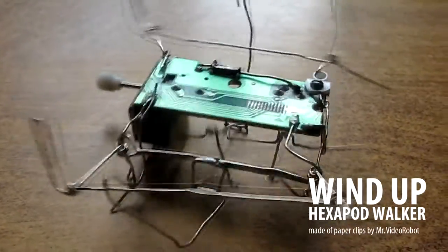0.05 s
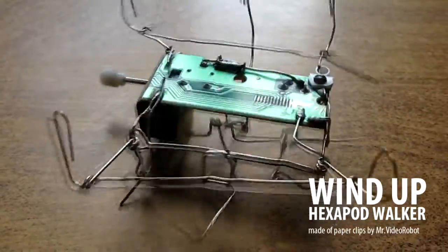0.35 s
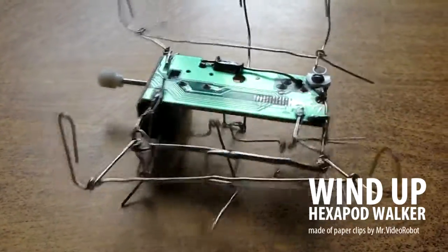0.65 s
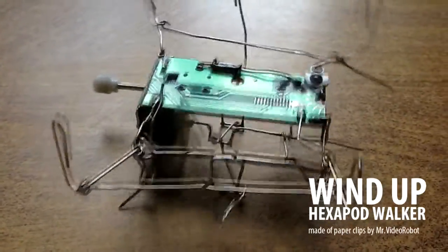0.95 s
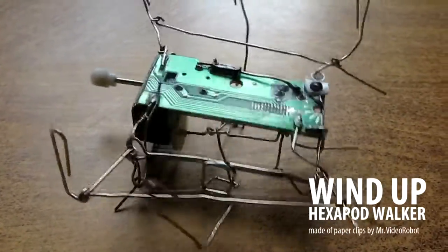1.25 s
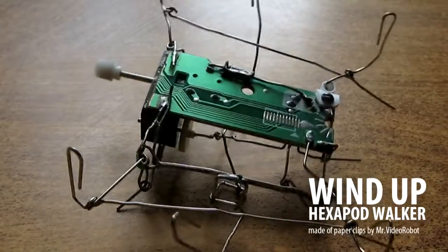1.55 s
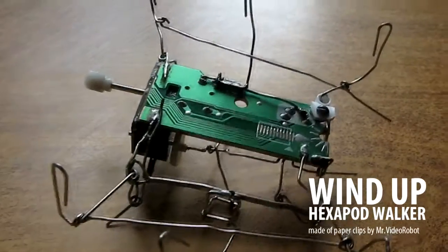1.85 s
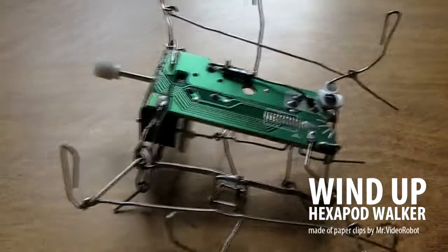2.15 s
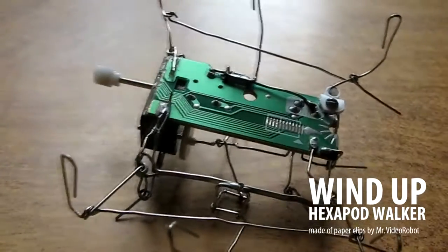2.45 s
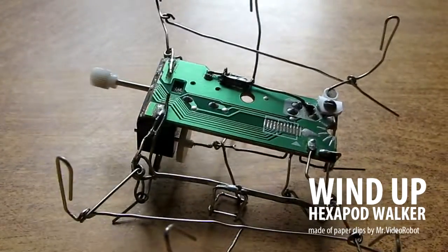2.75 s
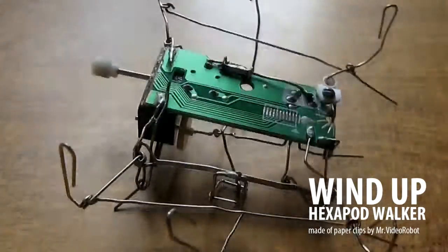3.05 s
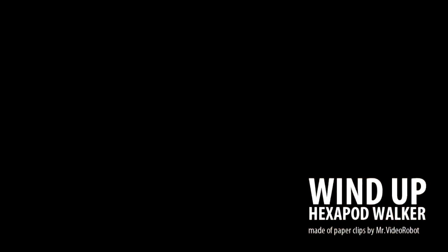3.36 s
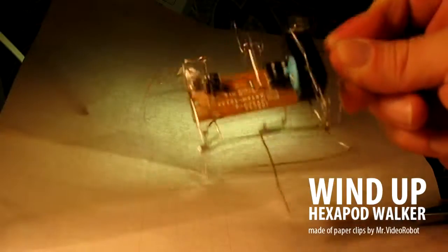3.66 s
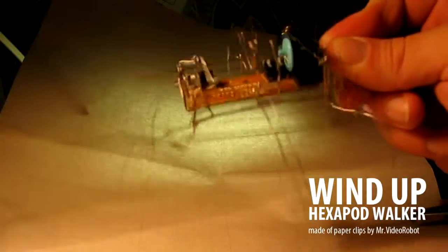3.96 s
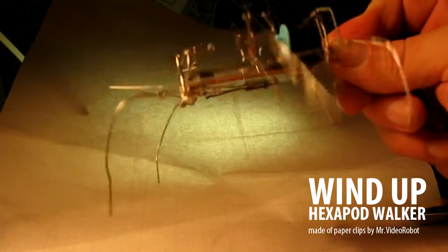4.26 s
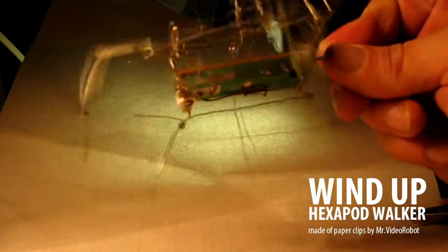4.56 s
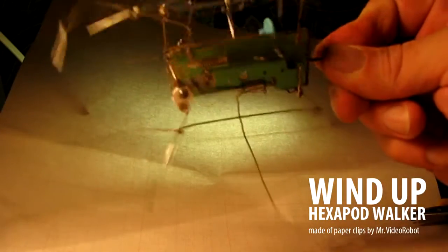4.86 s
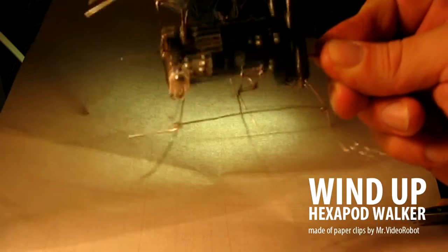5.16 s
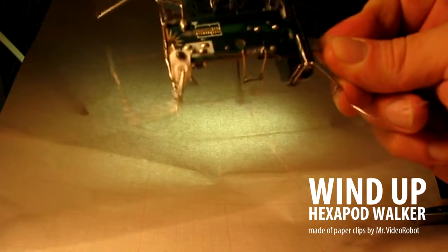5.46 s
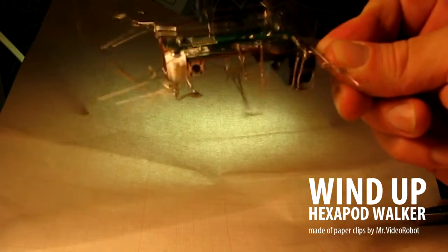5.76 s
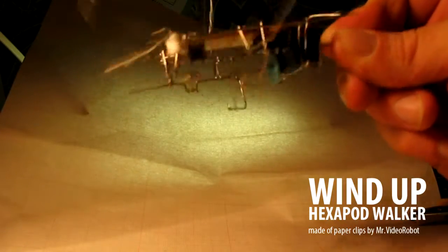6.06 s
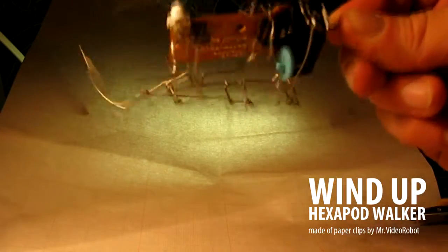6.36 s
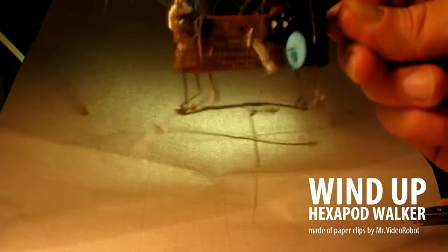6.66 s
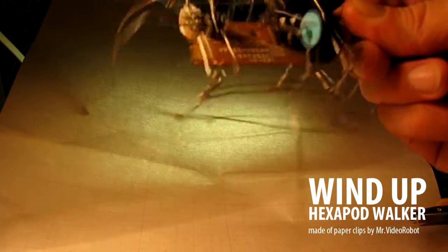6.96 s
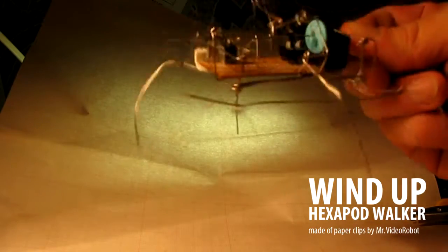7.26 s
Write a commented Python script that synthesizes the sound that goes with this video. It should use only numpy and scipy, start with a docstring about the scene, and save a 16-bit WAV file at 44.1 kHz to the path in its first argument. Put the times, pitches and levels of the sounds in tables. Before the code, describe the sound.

Clockwork toy walking on wood in halting, rattling bursts, stopping with a click; after a pause, a second wind-up mechanism buzzes continuously.

```python
"""Clockwork escapements of two wind-up walkers: an anchor strikes two pallets in turn in a plastic case.
The first toy rattles across a wooden table on wire legs, slows under every step and stops with a click.
Something squeaks faintly while the quiet room fades out.
Then the second toy, held in a hand with its legs in the air, buzzes steadily."""
import sys
import numpy as np
from scipy import signal
from scipy.fft import rfft, irfft, next_fast_len
from scipy.io import wavfile
from scipy.ndimage import map_coordinates

SR = 44100
rng = np.random.default_rng(int(sys.argv[2]) if len(sys.argv) > 2 else 0)


def pcm_store(signal):
    """Save signal as 16-bit PCM."""
    levels = np.round(np.clip(np.atleast_2d(signal), -1, 1) * 32767)
    wavfile.write(sys.argv[1], SR, levels.astype(np.int16).T)


N = 330750
TIME_S = np.arange(N) / SR
TOP_HZ = 15800


def amp(db):
    """Decibels to gain."""
    return 10 ** (np.asarray(db) / 20)


def unit(x):
    """x at rms 1."""
    return x / np.sqrt(np.mean(x ** 2) + 1e-20)


def gain_at(spectrum, hz):
    """Gain from (Hz, dB) rows, interpolated on a log frequency axis."""
    knots_hz, db = np.transpose(spectrum)
    return amp(np.interp(np.log(hz + 1), np.log(knots_hz + 1), db))


def curves(rows):
    """One value per sample for each column after the time."""
    times, *columns = np.transpose(rows)
    return [np.interp(TIME_S, times, column) for column in columns]


def wobble(rate_hz):
    """Smooth random curve with rate_hz knots a second."""
    knots = rng.standard_normal(int(N * rate_hz / SR) + 4)
    return map_coordinates(knots, [TIME_S * rate_hz])


def filtered(x, response):
    """x through a frequency response."""
    size = next_fast_len(N + SR // 4)
    return irfft(rfft(x, size) * response(np.fft.rfftfreq(size, 1 / SR)), size)[:N]


def resonance(x, hz, width_hz):
    """x through one damped mode."""
    return signal.lfilter(*signal.iirpeak(hz, hz / width_hz, fs=SR), x)


def noise(spectrum):
    """Coloured noise of rms 1."""
    return unit(filtered(rng.standard_normal(N), lambda hz: gain_at(spectrum, hz)))


def struck(blows, spectrum, size=2048):
    """Blows ring a body with a minimum-phase response of energy 1."""
    cepstrum = irfft(np.log(gain_at(spectrum, np.fft.rfftfreq(size, 1 / SR))))
    cepstrum[1:size // 2] *= 2
    cepstrum[size // 2 + 1:] = 0
    response = irfft(np.exp(rfft(cepstrum)))
    return signal.fftconvolve(blows, response / np.linalg.norm(response))[:N]


def contacts(times, gains, chatter, decay_s, size=1024):
    """Each contact is a sharp blow followed by decaying random chatter."""
    burst = rng.standard_normal((len(times), size)) * np.exp(-np.arange(size) / (decay_s * SR))
    burst[:, 0] = 0
    burst *= chatter / np.linalg.norm(burst, axis=1, keepdims=True)
    burst[:, 0] = -1
    at = np.round(np.maximum(times, 0) * SR).astype(int)[:, None] + np.arange(size)
    return np.bincount(at.ravel(), (burst * gains[:, None]).ravel(), N)[:N] / np.hypot(1, chatter)


def diffuse_tail(size, t60_s, rise_s):
    """Dense reflections: noise that builds up and decays."""
    t = np.arange(size) / SR
    return rng.standard_normal(size) * amp(-60 * t / t60_s) * (1 - np.exp(-t / rise_s))


def fade_out(power, start_s=1.525, end_s=3.36):
    """The first scene fades to silence; a lower power lingers longer."""
    return np.clip((end_s - TIME_S) / (end_s - start_s), 0, 1) ** power


def fade_in():
    """The second scene opens quickly out of silence."""
    return curves([(3.447, 0), (3.465, .2), (3.53, 1)])[0]


def room_echo(x):
    """Diffuse reflections from the table and walls."""
    tail = diffuse_tail(SR // 2, t60_s=0.22, rise_s=0.002848)
    return signal.fftconvolve(x, tail / np.linalg.norm(tail))[:N]


# Each row: frequency in Hz, level in dB.
DRONE_TONES = [(149, -63.5), (172, -68), (330, -66.5)]


def room_drone():
    """The first room's low drone wavers and fades out."""
    drone = sum(amp(db + 2.5 * wobble(17)) * np.sin(2 * np.pi * hz * TIME_S + .7 * wobble(12))
                for hz, db in DRONE_TONES)
    return fade_out(power=1.4) * drone


# Each row: frequency in Hz, relative level in dB.
HELD_ROOM_SPECTRUM = [(15, -32), (25, 5), (54, 9.5), (91, 4), (420, 0.5), (700, -8), (1500, -30)]


def held_room():
    """Hum and low room noise behind the held toy."""
    hum = amp(-69.5 + 1.1 * wobble(3.3)) * np.sin(2 * np.pi * 46.0 * TIME_S)
    return fade_in() * (hum + amp(-66.0) * noise(HELD_ROOM_SPECTRUM))


# Each row: frequency in Hz, relative level in dB.
RUMBLE_SPECTRUM = [(25, -11), (60, -5), (115, -8.5), (160, 0.5), (200, -3.5), (270, -5), (335, -4.5),
                   (450, -4.5), (600, -7.5), (1000, -10.5), (2000, -13.5), (4000, -52.5)]
HISS_SPECTRUM = [(300, -15), (900, -3), (1600, 1), (3200, -0.5), (5000, -4.5), (9000, -7.5), (12000, -13.5),
                 (15500, -18.5)]
# Each row: time in seconds the rumble change is fully in, time in seconds it starts to fade,
# gear rustle loss in dB, rumble change in dB. Gear rustle changes only where the second time is later.
PAUSES = [(.194, 0.23, -4.5, 11), (.42, 0.38, 3, -9.5), (.528, 0.6, -4, 10.5), (.777, 0.49, -0.5, 1.5),
          (.94, 1.02, 10.5, 11.5), (1.188, 3.4, 2.5, 7)]


def walking_room(rise_s=0.025, fall_s=0.059):
    """Low room noise comes up in most pauses of the ticking, as with automatic gain; fades with hiss."""
    change_db = np.zeros(N)
    for full_s, fade_s, _, db in PAUSES:
        before_s, after_s = np.maximum(full_s - TIME_S, 0), np.maximum(TIME_S - fade_s, 0)
        change_db += db * np.exp(-before_s / rise_s - after_s / fall_s)
    rumble = amp(-58 + change_db) * noise(RUMBLE_SPECTRUM)
    hiss = amp(-52.5) * noise(HISS_SPECTRUM)
    return fade_out(power=1.68) * (rumble + hiss)


# Each row: start in seconds, end in seconds, slip rate in Hz, resonance in Hz, level in dB.
SQUEAKS = [(0.527, 0.656, 1140, 1140, -48), (2.01, 2.114, 3235, 3250, -62.5), (2.2, 2.444, 370, 2480, -59),
           (2.462, 2.74, 323, 2100, -66), (2.488, 2.74, 319, 2870, -69), (2.875, 3.297, 312, 1350, -84),
           (2.9, 3.28, 312, 3300, -83.5)]


def squeaks():
    """Faint stick-slip squeaks: uneven slips through one resonance."""
    out = np.zeros(N)
    for start, end, slip_hz, ring_hz, db in SQUEAKS:
        cycles = np.cumsum(slip_hz * (1 + .005 * wobble(18) + .012 * wobble(250))) / SR
        slips = np.diff(np.floor(cycles), prepend=0)
        swell = np.sin(np.pi * np.clip((TIME_S - start) / (end - start), 0, 1))
        width_hz = 0.24 * ring_hz
        ring = resonance(resonance(slips, ring_hz, width_hz), ring_hz, width_hz)
        out += amp(db + 3.1 * wobble(23)) * swell * unit(ring)
    return out


# Each row: time in seconds, relative level in dB.
LEG_BUMPS = [(.152, -38.5), (.276, -38), (.288, -29.5), (.377, -37), (2.0517, -43), (4.5799, -39),
             (4.6946, -37), (4.866, -32.5), (4.8756, -40), (5.705, -37), (6.4504, -39), (6.6505, -37.5),
             (6.9662, -40.5), (7.2211, -37)]
# Each row: frequency in Hz, gain in dB.
BUMP_SPECTRUM = [(30, -2), (120, -2), (300, -1.5), (600, -1.5), (1000, 0.5), (1600, -3.5), (3500, -13.5)]


def leg_bumps():
    """Dry taps of a leg on the table or the fingers."""
    times, db = np.transpose(LEG_BUMPS)
    return struck(contacts(times, amp(db + 19.5), chatter=0.4, decay_s=0.0013), BUMP_SPECTRUM)


# Each row: time in seconds, relative level in dB.
FOOT_TAPS = [(0.027, -34), (0.2752, -31), (0.3647, -32), (0.7087, -30), (0.83, -31.5), (1.0126, -37.5),
             (1.123, -27), (1.976, -46.5), (2.9421, -57)]
# Each row: frequency in Hz, gain in dB.
FOOT_SPECTRUM = [(150, -17), (900, -17.5), (1400, -3), (1900, -3.5), (3000, -12), (9000, -34), (15000, -52)]


def feet():
    """Wire feet tap the wood."""
    times, db = np.transpose(FOOT_TAPS)
    return struck(contacts(times, amp(db + 20.0), chatter=1.3, decay_s=0.0081), FOOT_SPECTRUM)


# Each row: frequency in Hz, relative level in dB.
GEAR_SPECTRUM = [(500, -32.5), (1000, -21), (2200, -12), (3300, -1.5), (4400, -5.5), (6500, -5), (9000, -4),
                 (11400, -5), (13500, -8), (15500, -12.5)]


def gears(rate_hz, ramp_s=0.0093, coast_from_s=1.26, coast_db_per_s=182, settle_s=0.026):
    """Gears rustle with speed and load, coast to a halt and shift twice as they settle."""
    loss_db = sum(db * np.clip(np.minimum(TIME_S - first_s, second_s - TIME_S) / ramp_s, 0, 1)
                  for first_s, second_s, db, _ in PAUSES)
    speed_db = 2 * np.log2(rate_hz / rate_hz.mean())
    coast_db = coast_db_per_s * np.maximum(TIME_S - coast_from_s, 0)
    running = amp(-33.5 + speed_db - loss_db - coast_db)
    settling = sum(amp(db) * np.exp(-np.abs(TIME_S - at_s) / settle_s)
                   for at_s, db in [(1.42, -50.5), (1.52, -44.5)])
    return (running + settling) * amp(1.6 * wobble(70.14)) * noise(GEAR_SPECTRUM)


# Each row: time in seconds, relative level in dB.
CATCH_CLICKS = [(1.2247, -16), (1.275, -15), (1.494, -11), (1.505, -21), (1.517, -18.5), (1.523, -28),
                (1.533, -23), (1.542, -26.5), (2.05, -48), (2.097, -40)]
# Each row: frequency in Hz, gain in dB.
CATCH_SPECTRUM = [(350, -48), (600, -20), (820, -35), (902, -30), (2070, -12), (3570, 1.5), (3980, -8),
                  (7960, -7.5), (10000, -19), (11300, -7), (15500, -26)]


def catches():
    """The last teeth slip, then the mechanism catches and bounces."""
    times, db = np.transpose(CATCH_CLICKS)
    return struck(contacts(times, amp(db + 9.0), chatter=1.0, decay_s=0.0019), CATCH_SPECTRUM)


# Each row: time in seconds, relative level in dB.
TOOTH_SLIPS = [(.2208, -13.5), (.2338, -9.5), (.4334, -15), (.4494, -10.5), (.5588, -14.5), (.5686, -11),
               (.806, -11.5), (.811, -8.5), (.9005, -11.5), (.9258, -17.5), (.936, -12.5), (.951, -12),
               (.9621, -15.5), (.9787, -11.5), (.9902, -11), (1.007, -11.5), (1.0153, -7)]


def tooth_slips():
    """Single teeth slip with crisp ticks while the toy is stalled."""
    times, db = np.transpose(TOOTH_SLIPS)
    blows = contacts(times, amp(db + 5), chatter=0.91, decay_s=0.00066)
    return blows + amp(-3.0) * resonance(blows, hz=3400, width_hz=1200)


def anchor_beats(rate_hz, start_s, end_s, on_beat_s=(0,)):
    """Times and periods of the anchor's swings; a swing falls on each time in on_beat_s."""
    cycles = np.cumsum(rate_hz) / SR
    marks = np.interp(on_beat_s, TIME_S, cycles)
    whole = np.cumsum(np.round(np.diff(marks, prepend=0)))
    cycles += np.interp(TIME_S, on_beat_s, whole - marks)
    times = np.interp(np.arange(1, cycles[-1]), cycles, TIME_S)
    times = times[(times > start_s) & (times < end_s)]
    return times, 1 / np.interp(times, TIME_S, rate_hz)


def pallet(times, jitter_s, jitter_db, chatter, decay_s):
    """Blows on one pallet, uneven in time and strength."""
    late, hard = rng.standard_normal((len(times), 2)).T
    return contacts(times + jitter_s * late, amp(jitter_db * hard), chatter, decay_s)


def dispersed(x, lead_s):
    """Bending waves in the case: TOP_HZ arrives lead_s before the lowest frequencies."""
    return filtered(x, lambda hz: np.exp(1j * np.pi * lead_s * hz ** 2 / TOP_HZ))


# Each row: time in seconds, beats per second.
WALK_RATE = [(.006, 104), (.045, 125), (.078, 113), (.09, 88), (.145, 88), (.194, 58), (.244, 55),
             (.3, 100), (.377, 129), (.42, 105), (.464, 76), (.487, 121), (.529, 66), (.578, 60),
             (.67, 102), (.69, 132), (.712, 112), (.737, 115), (.79, 64), (.818, 93), (.888, 53),
             (1.025, 68), (1.068, 103), (1.14, 111), (1.187, 96)]
# Runs between stalls. Each row: first beat in seconds, last beat in seconds.
WALK_RUNS = [(.0062, .1938), (.2446, .4202), (.4646, .5289), (.5781, .7904), (.8183, .8884),
             (1.0256, 1.1876)]
# Each row: time in seconds, relative beat force in dB.
WALK_FORCE = [(.08, -0.5), (.19, -0.5), (.25, 2.5), (.34, 3.5), (.42, -4), (.47, 2), (.53, 0), (.6, 2.5),
              (.72, 0.5), (.78, -4.5), (.83, 2.5), (.86, 0), (1.025, 1.5), (1.07, 4), (1.11, 0),
              (1.17, -1.5), (1.19, -5)]
# Each row: frequency in Hz, case gain in dB.
WALK_CASE_SPECTRUM = [(100, -47), (800, -26), (2200, -17), (2700, -5), (3600, -2), (4500, -10), (5600, -2),
                      (6600, -4.5), (7600, -11), (9200, -1), (11300, 2), (13000, -8), (15500, -20.5)]


def walking_toy():
    """Loaded escapement: a hard entry blow and a softer, duller exit blow per beat, over gear rustle."""
    rate_hz, force_db = curves(WALK_RATE)[0], curves(WALK_FORCE)[0]
    times, period = anchor_beats(rate_hz, 0, 1.21, on_beat_s=np.ravel(WALK_RUNS))
    running = np.any([(times > first - period / 2) & (times < last + period / 2)
                      for first, last in WALK_RUNS], axis=0)
    times, period = times[running], period[running]
    entry = pallet(times, jitter_s=.0001, jitter_db=1.5, chatter=0.71, decay_s=.00035)
    exit_blow = pallet(times + .4 * period, jitter_s=.00017, jitter_db=2.2, chatter=1.2, decay_s=.00035)
    exit_blow = amp(-7.0) * exit_blow + amp(-8.0) * resonance(exit_blow, hz=3500, width_hz=1400)
    blows = amp(force_db) * entry + amp(0.94 * force_db) * exit_blow + tooth_slips()
    ticks = amp(0.8) * dispersed(struck(blows, WALK_CASE_SPECTRUM), lead_s=.0005)
    return ticks + gears(rate_hz)


def case_rattle(x, patterns=28, size=SR // 16):
    """Short diffuse ring of the case; its fine pattern changes as the toy turns."""
    position = np.linspace(0, patterns - 1, N)
    out = np.zeros(N)
    for k in range(patterns):
        tail = unit(diffuse_tail(size, t60_s=0.029, rise_s=0.0039))
        near = np.abs(position - k) < 1
        crossfade = np.cos(np.pi / 2 * (position[near] - k))
        out[near] += crossfade * signal.fftconvolve(x[near], tail)[:near.sum()]
    return out / np.sqrt(size)


def facing_modes(x, modes, order):
    """Each mode stands out while it faces the listener; order 2 steepens its flanks."""
    out = x
    for hz, width_hz, peak_s, spread_s, db in modes:
        ring = x
        for _ in range(order):
            ring = resonance(ring, hz, width_hz)
        facing = np.exp(-((TIME_S - peak_s) / spread_s) ** 2)
        out = out + amp(db) * facing * ring
    return out


# Each row: time in seconds, middle gain in dB, low case ring gain in dB, treble gain in dB.
TURN_BANDS = [(3.5, -0.5, 0.5, 1), (3.7, -0.5, 0.5, 0), (4.35, -1, 0, 1), (4.65, 0.5, 2, 1),
              (5.2, -0.5, 1.5, 0), (5.45, 0, 1, -2), (5.9, 0, -1, -1), (6.15, -4, -2.5, 2),
              (6.5, -0.5, -1.5, -0.5), (6.9, 1, 0, -1), (7.5, -1, -1, -2)]
# Modes of the held toy and of the board that carries it.
# Each row: frequency in Hz, width in Hz, peak time in seconds, spread in seconds, added level in dB.
TOY_MODES = [(2320, 310, 5.504, 0.35, 2), (2560, 320, 6.916, 0.53, 3.5), (2700, 390, 4, 0.67, -3),
             (3000, 570, 3.86, 0.29, -14), (3080, 200, 6.07, 0.32, 1), (3340, 140, 7.25, 0.34, -7),
             (4346, 187, 5.33, 0.16, 0), (4370, 210, 5.894, 0.42, 7), (5452, 620, 6.29, 0.22, 7),
             (6255, 400, 4.22, 0.22, -1), (6095, 380, 5.21, 0.22, 0), (6000, 160, 5.69, 0.35, 0),
             (6477, 995, 7.04, 0.36, -1), (7550, 240, 3.53, 0.54, 3.5), (7320, 190, 5.3, 0.97, -4),
             (8360, 290, 3.38, 0.44, 4), (8407, 330, 7.004, 0.3, -1), (11250, 220, 5.57, 0.13, 3),
             (11300, 446, 6.774, 0.27, -2.5), (12500, 181, 4.2, 0.2, -1), (12400, 130, 4.9, 0.7, -1),
             (13000, 270, 5.81, 0.28, -7), (13100, 200, 3.97, 0.38, 0), (13400, 200, 5.1, 0.55, 2.5),
             (13380, 530, 7.3, 0.18, 6.5)]
BOARD_MODES = [(1680, 420, 3.59, .22, 8.5), (1604, 520, 3.98, 0.2, 6.5), (1599, 290, 5.22, 0.16, 3.5),
               (1580, 420, 5.77, 0.3, 6), (1597, 490, 7.016, 0.44, 5.5), (830.6, 140, 5.15, 0.13, 1.5),
               (840, 150, 4.68, 0.25, 0), (870, 280, 6.8, .6, -7.5)]


def hand_turning(x):
    """The hand turns the toy: three bands shift in level and single modes come and go."""
    middle_db, low_db, treble_db = curves(TURN_BANDS)
    low = filtered(x, lambda hz: 1 / (1 + (hz / 4600) ** 12))
    treble = filtered(x, lambda hz: 1 - 1 / (1 + (hz / 10700) ** 20))
    coloured = amp(middle_db) * (x - low - treble) + amp(low_db) * low + amp(treble_db) * treble
    coloured = facing_modes(coloured, TOY_MODES, order=1)
    return facing_modes(coloured, BOARD_MODES, order=2)


# Each row: time in seconds, beats per second, relative force in dB.
HELD_RUN = [(3.5, 120, 0), (3.58, 136, 0), (3.64, 130, 2.5), (3.69, 107, 0), (3.75, 118, 2),
            (3.84, 129, -1), (3.95, 109, 1), (4.07, 134, 0), (4.12, 110, -2.5), (4.22, 92, 0.0),
            (4.27, 101, 0), (4.34, 127, 0.5), (4.52, 107, 0), (4.54, 115, 1.5), (4.67, 127, -1),
            (4.71, 123, -4), (4.75, 127, 0), (4.8, 108, -2.5), (4.83, 107, 0.5), (4.91, 119, 0),
            (4.96, 119, -4), (5.03, 123, 0), (5.09, 108, -1.5), (5.16, 122, 1.5), (5.35, 132, 0.5),
            (5.39, 122, 1.5), (5.44, 141, 0), (5.56, 126, 1), (5.64, 119, -2), (5.69, 123, 1),
            (5.74, 152, 0.5), (5.81, 134, 0.5), (5.9, 138, 1.5), (5.98, 147, 1), (6.1, 129, -0.5),
            (6.12, 124, 2), (6.18, 135, 0), (6.26, 143, 1.5), (6.31, 121, -1), (6.39, 141, 0.5),
            (6.57, 132, 0.5), (6.64, 123, 2.5), (6.77, 125.5, -0.5), (6.85, 111, -1), (6.92, 125, 2.0),
            (6.99, 125, 0), (7.03, 122, -2.5), (7.18, 119, 2), (7.24, 126, -1), (7.36, 112, -1.5),
            (7.39, 104, 1.5), (7.48, 103, 2)]
# Each row: frequency in Hz, case gain in dB.
HELD_CASE_SPECTRUM = [(60, -35), (150, -34.5), (400, -31.5), (600, -25.5), (840, -21), (1300, -21),
                      (2050, -20.5), (2650, -11.5), (3150, -3.5), (4000, -10.5), (5000, -13), (6200, -5),
                      (7500, -6), (9600, -7.5), (12500, -0.5), (15500, -11.5)]


def held_toy():
    """Unloaded, the escapement runs faster and rebounds; it weakens when the legs bind."""
    rate_hz, force_db = curves(HELD_RUN)
    times, period = anchor_beats(rate_hz * (1 + .004 * wobble(45)), start_s=3.45, end_s=7.5)
    flutter_db = 0.8 * wobble(22)
    entry = pallet(times, jitter_s=.00005, jitter_db=0.04, chatter=0.56, decay_s=.00067)
    rebound = pallet(times + .0014, jitter_s=.00012, jitter_db=1.7, chatter=1.0, decay_s=.00036)
    exit_blow = pallet(times + .34 * period, jitter_s=.00012, jitter_db=1.9, chatter=2.8, decay_s=.002)
    graze = pallet(times - .0005, jitter_s=.00012, jitter_db=5.5, chatter=1, decay_s=.00028)
    blows = amp(-12) * graze + entry + amp(-8.0) * rebound + amp(-4.0) * exit_blow
    rattle = amp(-10.5) * case_rattle(blows)
    gear_hiss = amp(-35) * rng.standard_normal(N)
    buzz = dispersed(struck(blows + rattle + gear_hiss, HELD_CASE_SPECTRUM), lead_s=.0004)
    return amp(-3 + force_db + flutter_db) * hand_turning(buzz) * fade_in()


def scene():
    """The walking toy in its room, then the held one; mono."""
    toy = walking_toy() + catches() + feet()
    walking = toy + amp(-14.5) * room_echo(toy) + squeaks() + walking_room() + room_drone()
    return (walking + held_toy() + leg_bumps() + held_room())[None]


def record(dry):
    """Soft clipping rounds the sharpest ticks; a steep low-pass cuts at TOP_HZ."""
    rounded = dry[0] / (1 + np.abs(dry[0] / .8) ** 4) ** (1 / 4)
    return filtered(rounded, lambda hz: 1 / (1 + (hz / TOP_HZ) ** 160))[None]


dry = scene()
out = record(dry)
pcm_store(out)
```